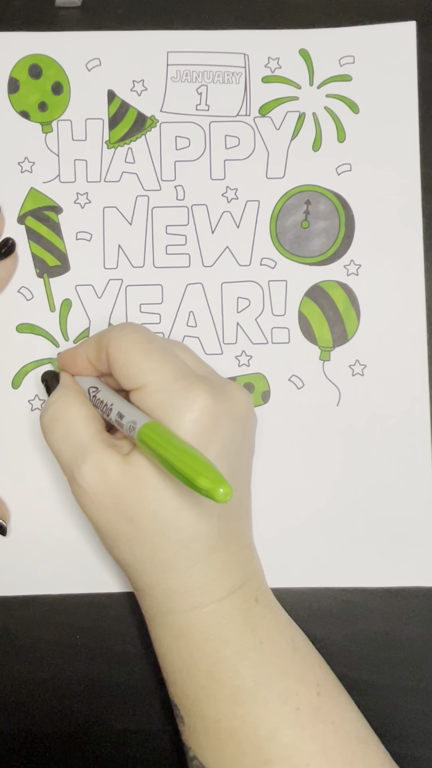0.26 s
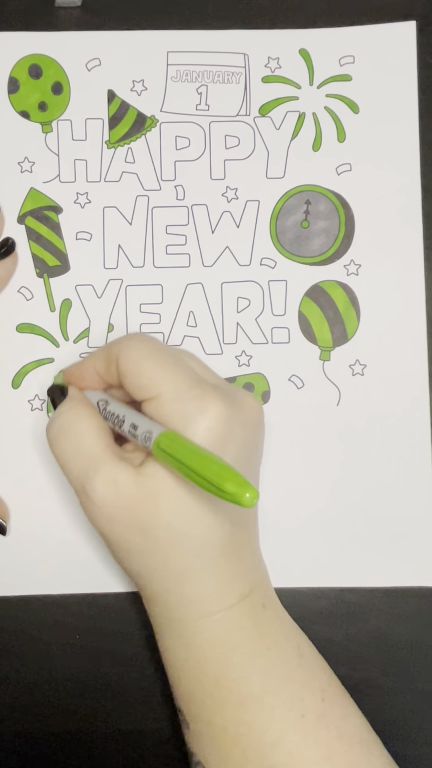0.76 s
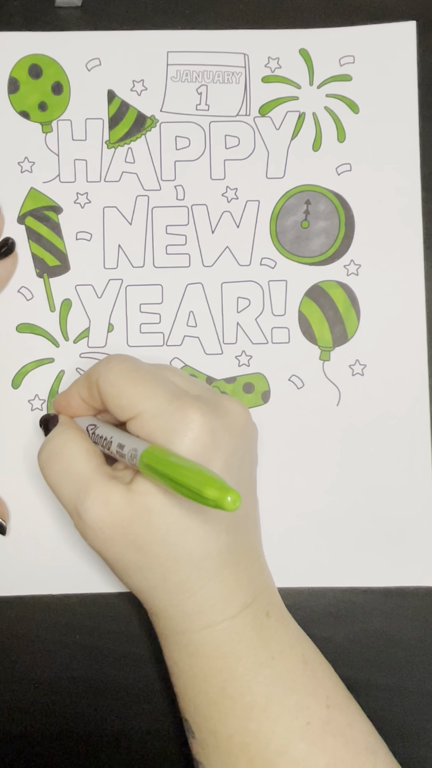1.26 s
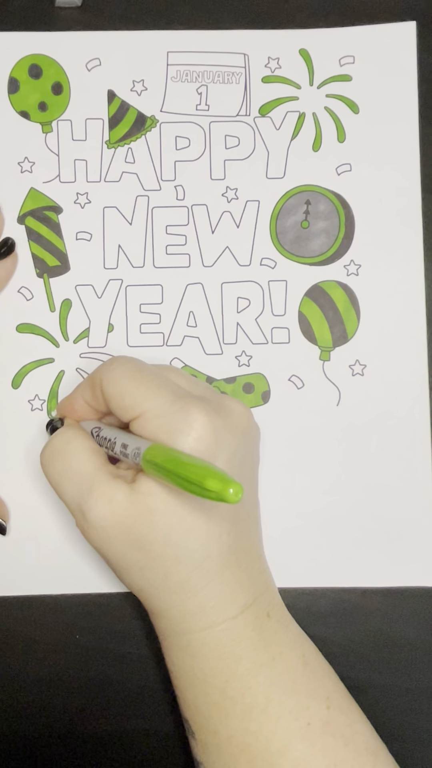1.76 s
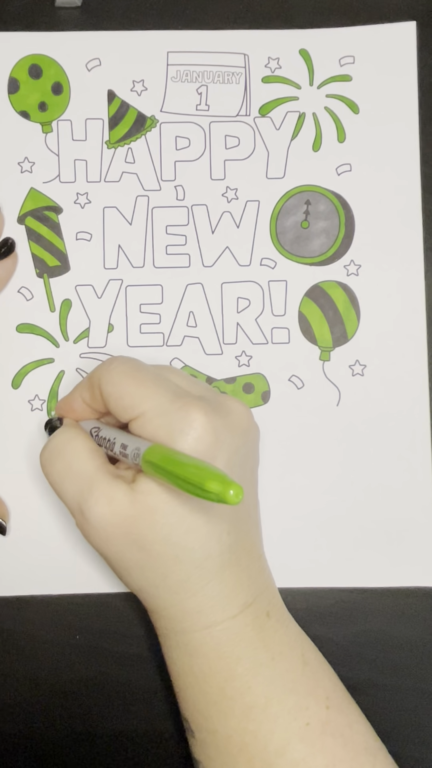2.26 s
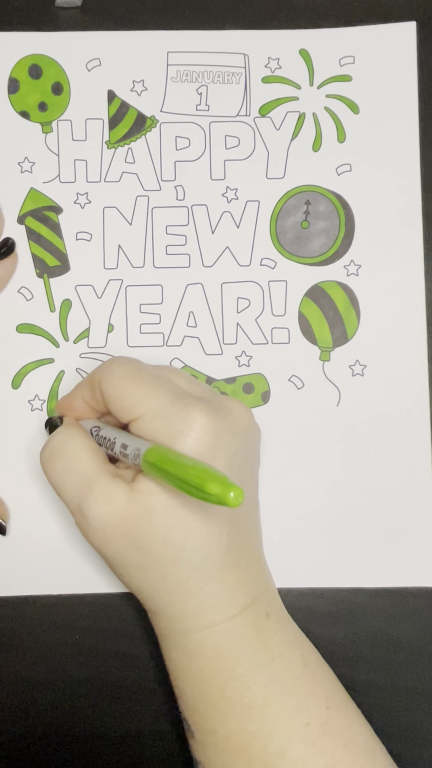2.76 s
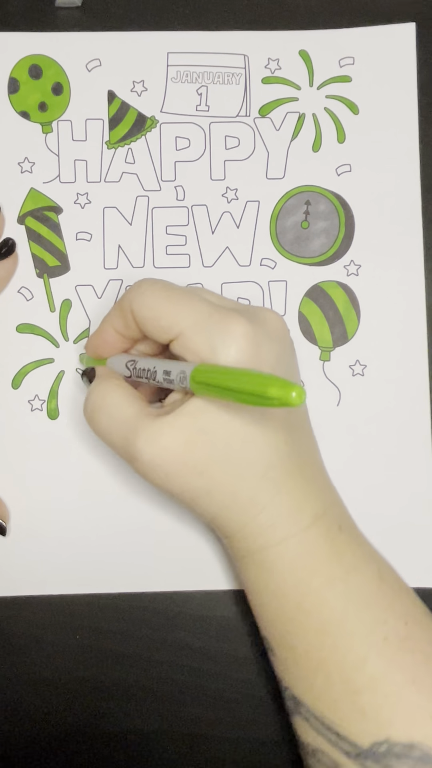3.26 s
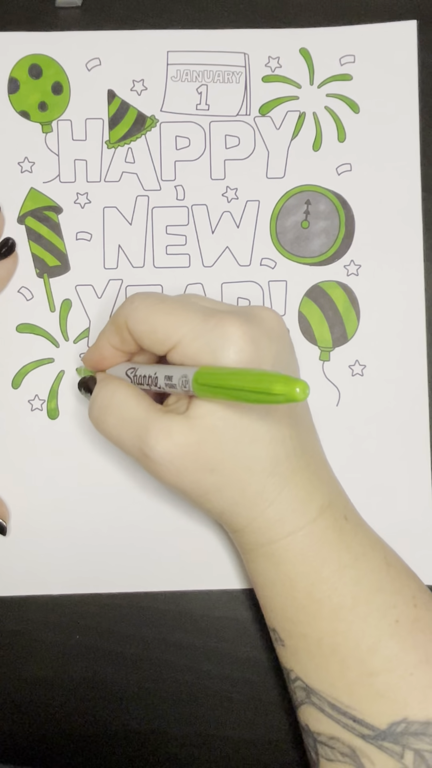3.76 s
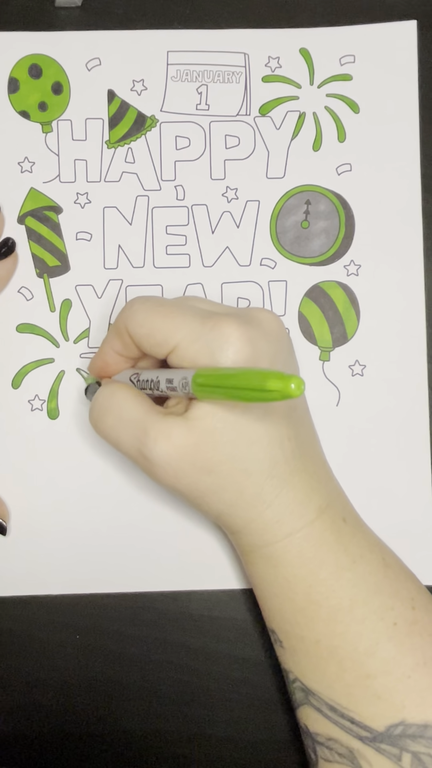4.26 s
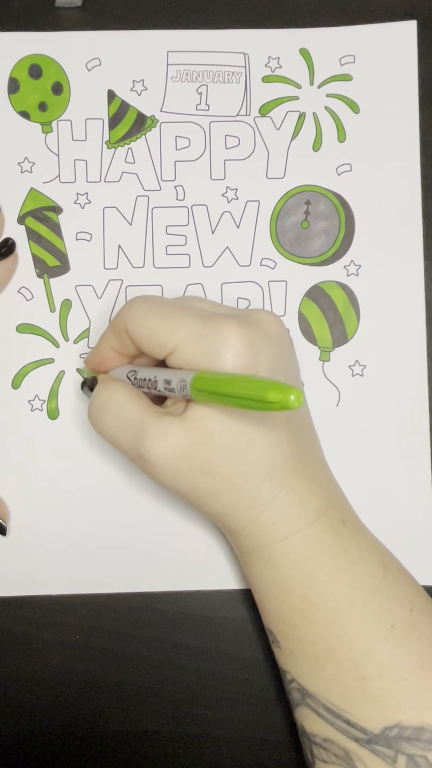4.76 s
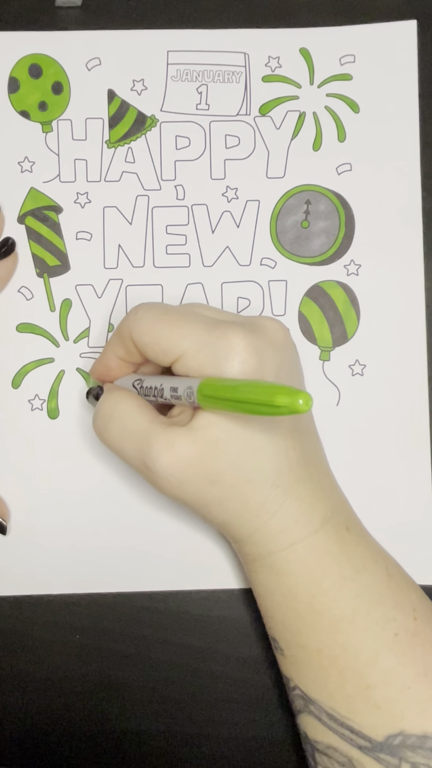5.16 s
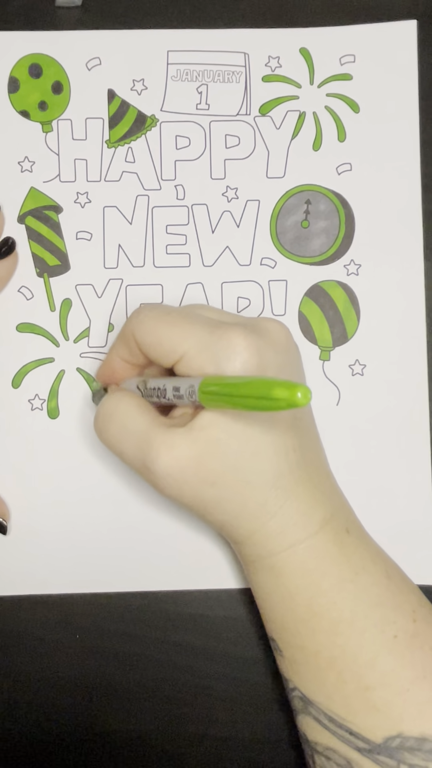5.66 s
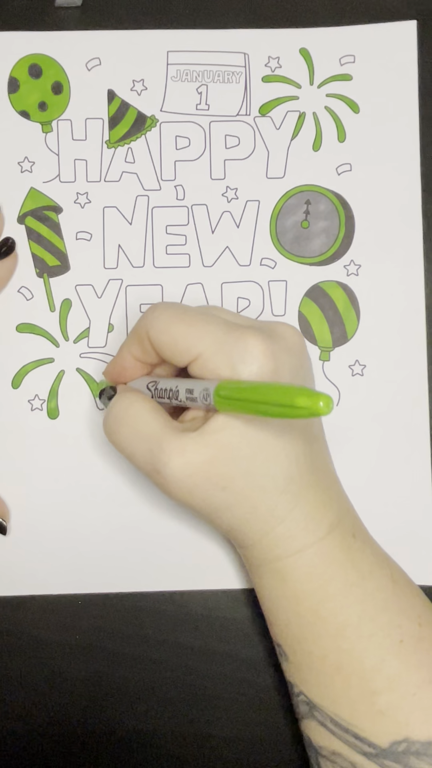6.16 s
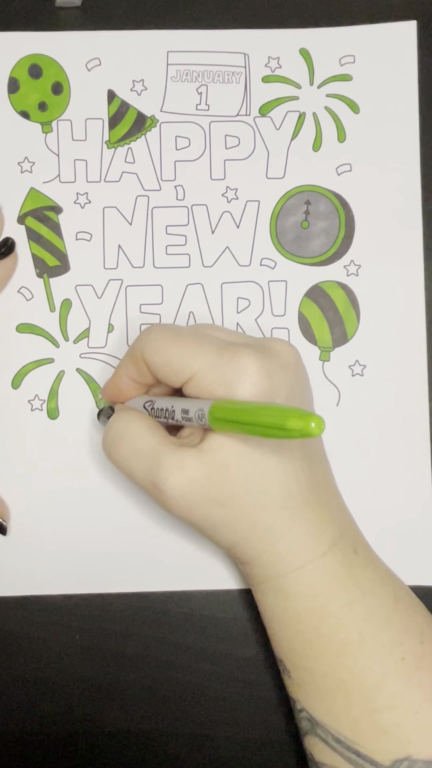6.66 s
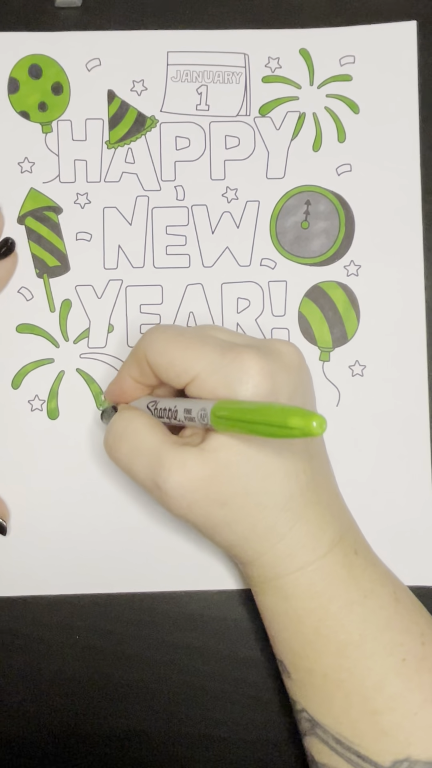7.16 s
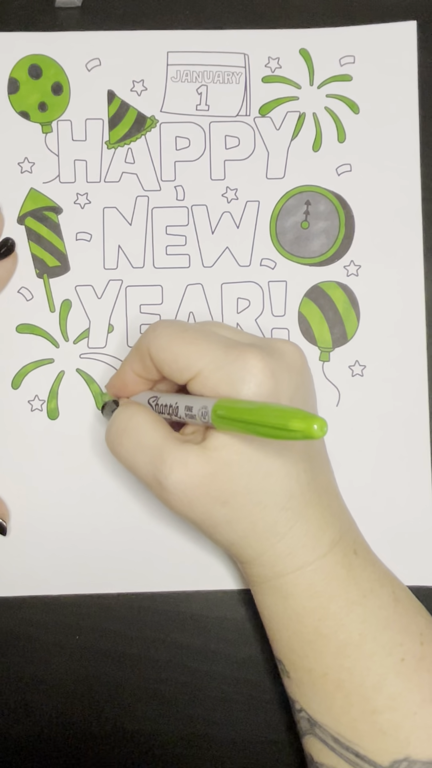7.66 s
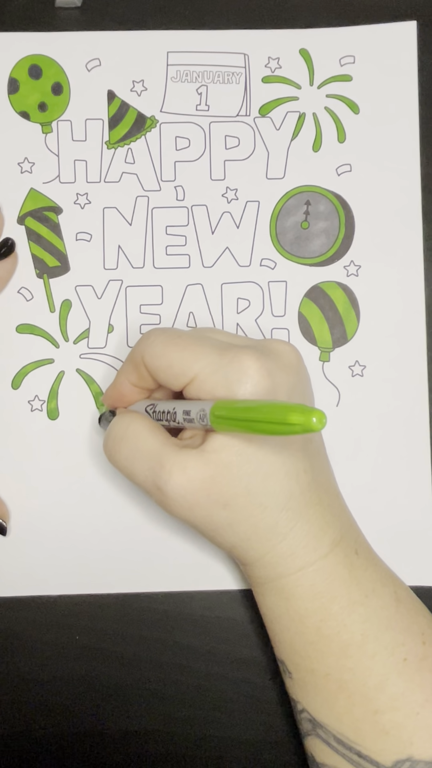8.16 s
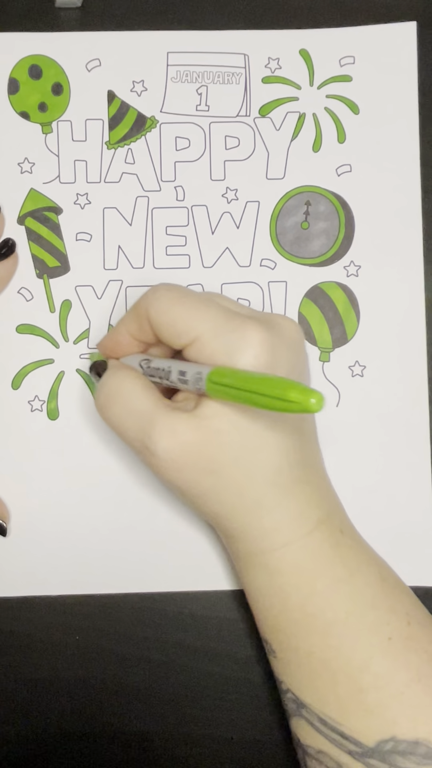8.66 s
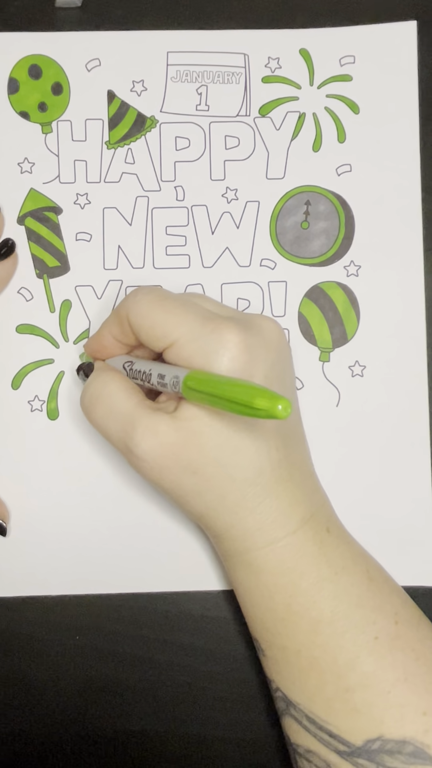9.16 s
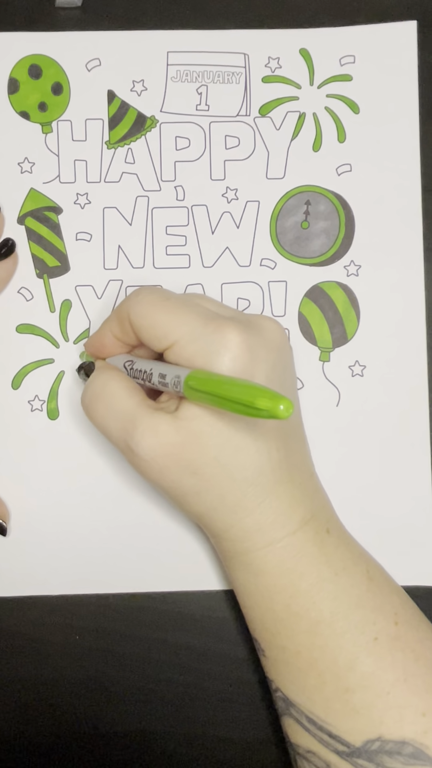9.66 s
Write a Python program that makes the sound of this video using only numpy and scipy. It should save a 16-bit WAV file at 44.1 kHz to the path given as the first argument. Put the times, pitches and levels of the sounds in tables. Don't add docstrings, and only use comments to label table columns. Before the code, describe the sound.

Close to a sheet of paper on a desk, a hand brushes softly, then a felt-tip marker makes faint outlining scratches and bursts of quick, dry back-and-forth colouring strokes. Between bursts the hand slides and regrips. Light desk bumps and forearm rubs accompany it, over low fan and mains hum in a small furnished room.

```python
import sys
import numpy as np
from scipy import signal
from scipy.fft import rfft, irfft, next_fast_len
from scipy.io import wavfile
from scipy.ndimage import uniform_filter1d, map_coordinates

SR = 44100
rng = np.random.default_rng(int(sys.argv[2]) if len(sys.argv) > 2 else 0)


def ratio_of_db(decibels):
    return 10 ** (np.asarray(decibels, float) / 20)


def wav_record(signal):
    frames = np.transpose(np.atleast_2d(signal))
    bounded = np.clip(frames, -1, 1)
    quanta = np.round(bounded * 32767).astype(np.int16)
    wavfile.write(sys.argv[1], SR, quanta)


N = 437472

# [f/Hz, width/Hz, level/dB]
SHEET_MODES = [(1170, 920, -7.5), (2280, 2600, -6.5), (4010, 1140, -5), (5600, 2100, -6),
               (7400, 1400, -5.5), (8550, 1400, -2.5), (9700, 880, 2), (10730, 740, -1.5)]
# [f/Hz, width/Hz, level/dB]
DESK_TOP_MODES = [(618, 530, -15.5), (893, 115, -9.5), (1260, 240, -25)]


def marker():
    # [t/s, length/s, peak level/dB, rise/s]
    outline = [(1.108, 0.064, -78, .018), (1.189, 0.063, -70, .009), (1.298, .088, -77.1, .014),
               (1.357, 0.043, -71, .008), (1.413, 0.11, -71.5, 0.043), (1.523, 0.18, -71.5, .008),
               (1.65, 0.11, -68.5, 0.039), (1.725, 0.11, -61.5, 0.098), (1.818, 0.23, -56, 0.098),
               (1.884, 0.032, -51, .002), (2.06, 0.12, -63, 0.012), (2.12, 0.14, -58, 0.043),
               (2.25, 0.078, -62.5, 0.067), (2.312, 0.12, -61, 0.015), (2.396, .06, -66, 0.0081)]
    strokes_1 = [(2.46, 0.081, -51.5, 0.0084), (2.55, 0.078, -51.5, 0.015), (2.63, 0.077, -50, 0.011),
                 (2.711, 0.062, -48.5, 0.0076), (2.773, 0.071, -49.5, 0.02), (2.848, 0.038, -48.5, 0.0051)]
    strokes_2 = [
        (3.893, .036, -89, .017),
        (4.012, .03, -79.5, .004),
        (4.139, 0.19, -52, 0.11),
        (4.378, 0.13, -47.5, 0.0078),
        (4.521, .12, -48.5, 0.045),
        (4.66, 0.1, -44.5, 0.0094),
        (4.775, .11, -47, 0.019),
        (4.901, 0.068, -46.5, 0.017),
    ]
    strokes_3 = [
        (5.264, 0.17, -51, 0.071),
        (5.443, 0.096, -44, 0.0077),
        (5.541, 0.094, -42, 0.017),
        (5.65, 0.072, -40, 0.015),
        (5.737, 0.093, -44.5, 0.012),
        (5.845, 0.068, -43, 0.0056),
        (5.921, 0.11, -46, 0.018),
        (6.03, 0.031, -78, .006),
    ]
    strokes_4 = [
        (6.556, 0.13, -53.5, 0.073),
        (6.701, 0.072, -47, 0.018),
        (6.786, 0.087, -47, .013),
        (6.869, 0.085, -44, 0.055),
        (6.964, 0.08, -43.5, 0.008),
        (7.044, 0.068, -40, 0.019),
        (7.128, 0.069, -42, 0.0048),
        (7.202, 0.069, -40, 0.025),
        (7.285, 0.071, -44, 0.0074),
        (7.362, 0.021, -72, .006),
    ]
    strokes_5 = [(7.615, 0.13, -58.5, 0.08), (7.725, 0.19, -67.5, 0.062), (7.895, 0.092, -61.5, 0.052),
                 (8.017, 0.12, -60.5, 0.032), (8.146, 0.019, -62, 0.007), (8.166, 0.039, -62, 0.0027),
                 (8.253, 0.16, -64.5, 0.019), (8.402, 0.052, -54, 0.0077)]
    strokes_6 = [(9.212, 0.17, -55, 0.063), (9.378, 0.19, -57, 0.044), (9.49, .19, -59.5, 0.0084),
                 (9.663, 0.021, -62.5, .007), (9.686, .18, -55, 0.066), (9.878, 0.0079, -58.5, 0.0028),
                 (9.86, .12, -58.5, 0.068)]
    # [f/Hz, width/Hz, level/dB]
    grip_outline = [(1300, 2000, -13.5), (2050, 570, -8.5), (2790, 230, -13), (3550, 910, -11),
                    (4540, 550, -14), (4900, 440, -14), (5400, 620, -7.5), (6880, 660, -7),
                    (8420, 1400, -6.5), (8800, 680, -8), (9760, 530, 1.5), (10600, 600, -5),
                    (11570, 370, -13)]
    grip_1 = [(1320, 1600, -17.5), (2060, 660, -7.5), (2780, 260, -11.5), (3570, 1300, -15.5),
              (4640, 620, -13), (5030, 200, -26), (5460, 850, -10), (6840, 390, -4.5), (8560, 2900, -9.5),
              (8900, 1100, -13), (9700, 990, 4), (10500, 680, -5.5), (11640, 440, -13)]
    grip_2 = [(1460, 430, -5), (1980, 460, -1.5), (2700, 500, -8.5), (3630, 520, -5.5), (4430, 420, -4.5),
              (5080, 810, -3.5), (5720, 750, 2), (7200, 810, -4.5), (8400, 1300, -8), (9100, 630, -12),
              (9740, 1040, -7.5), (11150, 580, -5), (12650, 530, -21.5)]
    grip_3 = [(1480, 410, -9.5), (2006, 400, -3), (2700, 460, -8.5), (3610, 710, -7), (4380, 400, -6.5),
              (4870, 710, -4.5), (5620, 800, 3), (7220, 1100, -6), (8630, 1300, -6), (8950, 550, -6),
              (10070, 970, -1), (11250, 340, -1.5), (12660, 640, -14.5)]
    grip_4 = [(1520, 370, -12), (2000, 550, -7.5), (2680, 430, -10), (3560, 820, -7.5), (4400, 720, -6.5),
              (5030, 990, -9), (5550, 770, -1.5), (6970, 1200, -10.5), (8520, 1700, -17),
              (9160, 1030, -2.5), (10180, 610, 0.7), (10570, 550, 1.5), (12450, 860, -19)]
    grip_5 = [(1460, 1300, -11.5), (1970, 350, -8), (2690, 400, -16), (3560, 720, -6.5), (4370, 630, -9),
              (4900, 340, -13), (5400, 1200, -3.5), (7170, 660, -8.5), (8350, 910, -23), (9400, 1170, 1.5),
              (10420, 510, 2), (10550, 440, -0.5), (11500, 440, -19)]
    grip_6 = [(1400, 550, -5.5), (1900, 880, -8.5), (2830, 1110, -24), (3660, 520, -5.5), (4400, 230, -11),
              (5300, 1300, -7.5), (5930, 630, -2), (7250, 850, -6), (8250, 950, -6), (9000, 980, -12),
              (9940, 590, 2.5), (10830, 460, -3.5), (11600, 780, -14)]
    # [share of the stroke after its rise spent slowing,
    # brightness/dB, brightness per level over the grip's mean/(dB/dB)]
    touches = [(0.75, -3.5, 0.13), (0.77, -2, 0.7), (0.81, -1, 0.57), (0.63, -0.5, .5), (0.56, 1.8, .4),
               (1, -2.5, -0.14), (0.86, 0, -1.1)]
    returns = [(1.005, 1), (1, 1), (1.002, 1.06), (1, 0.78), (1, 0.79), (1.003, 1.04), (0.993, 1.07)]
    sheens = [
        [0, 0, 0, 0, 0, 0, 0, 0, 0, 0, 0, 0, 0, 0, 0],
        [0, -0.5, 0, -1.5, -0.5, -1],
        [3, 1, 0, 2, 2.5, 1, 0, 0],
        [0, 1.5, 1.5, 1.5, 1, 1, -0.5, 3],
        [0, 0, 0, 0.5, -0.2, 1, -0.5, 0, 0.7, 6],
        [-3, 0, 7, -1, -10, -8, 1, 1],
        [-1, -2.5, 0.5, -5, 1, -1, -3],
    ]
    firmness = [0.3, 0.97, -1.3, -1.5, -0.8, 0.8, 0.3]

    strokes = [outline, strokes_1, strokes_2, strokes_3, strokes_4, strokes_5, strokes_6]
    grips = [grip_outline, grip_1, grip_2, grip_3, grip_4, grip_5, grip_6]
    total = np.zeros((2, N))
    for rows, grip, firm_db, touch, back, sheen in zip(strokes, grips, firmness, touches, returns, sheens):
        desk = [(hz, width, db + firm_db) for hz, width, db in DESK_TOP_MODES]
        total += friction(rows, grip + desk, touch, back,
                          grain_db=1.5, drift_db=1.07, skip_db=1.5, sheen_db=sheen)
    return total


def friction(rows, modes, touch, back, grain_db, drift_db, skip_db, sheen_db=None):
    out = np.zeros((2, N + 2 * SR))
    slowing, grip_db, per_db = touch
    mean_db = np.mean([row[2] for row in rows])
    for n, (start_s, length, peak_db, rise) in enumerate(rows):
        pitch, slower = back if n % 2 else (1, 1)
        t = np.arange(int(length * SR)) / SR
        fall = max(slowing * slower * (length - rise), min(0.018, length / 2))
        bright_db = grip_db + per_db * (peak_db - mean_db)
        if sheen_db:
            bright_db += sheen_db[n]
        fibres = fibre_noise(len(t), peak_db, grain_db, skip_db)
        early, late = filtered(fibres, stroke_response(modes, drift_db, pitch, bright_db))
        sound = early + (late - early) * t / length
        treble = filtered(sound, lambda f: (f > 2500) & (f < 11500))
        at = SR + round(start_s * SR)
        out[:, at:at + len(t)] += sound / np.std(treble) * ratio_of_db(peak_db) * tip_speed(t, length, rise, fall)
    return out[:, SR:SR + N]


def fibre_noise(count, peak_db, grain_db, skip_db):
    clumps = uniform_filter1d(rng.standard_normal(count), 60)
    flutter = uniform_filter1d(rng.standard_normal(count), 450) * np.sqrt(450)
    light = np.clip((-44.0 - peak_db) / 15, 0.2, 1)
    return rng.standard_normal((2, count)) * ratio_of_db(grain_db * unit(clumps) + skip_db * light * flutter)


def stroke_response(modes, drift_db, pitch, bright_db):
    ripple = rng.standard_normal(200)
    drift = drift_db * rng.standard_normal(len(modes))
    pitch = pitch * (1 + 0.013 * rng.standard_normal())
    glide = 0.02 * rng.standard_normal() * np.array([-0.5, 0.5])[:, None, None]

    def ring(f):
        power = 0
        for (hz, width, db), extra_db in zip(modes, drift):
            detuning = (hz * hz - f * f) / (f * width + 1)
            power = power + (ratio_of_db(db + extra_db) / (1 + detuning ** 2)) ** 2
        return np.sqrt(power)

    def tilt(f):
        shelf = ratio_of_db(bright_db / (1 + (7500 / (f + 1)) ** 8))
        return shelf / np.sqrt(1 + (f / 12900) ** 30)

    def comb(f):
        ripple_db = 1.6 * np.interp(f, np.linspace(0, SR / 2, len(ripple)), ripple)
        return ratio_of_db(ripple_db) * (f > 0)

    return lambda f: ring(f / (pitch + glide)) * tilt(f) * comb(f / (1 + glide))


def tip_speed(t, length, rise, fall):
    start = np.clip(t / rise, 0, 1) ** 0.8
    stop = np.sin(np.pi / 2 * np.clip((length - t) / fall, 0, 1)) ** 1.5
    return start * stop


def ticks():
    # [t/s, peak level/dB]
    snaps = [(2.2882, -52), (2.3294, -56), (4.151, -59), (7.954, -49), (8.084, -50), (9.4045, -51),
             (9.4225, -48), (9.5044, -45), (9.5477, -45), (9.6044, -60), (9.6474, -53)]
    length, rms_db = 0.004, -7
    rows = [(s - length / 5, length, db + rms_db, length / 5) for s, db in snaps]
    return friction(rows, SHEET_MODES, (1, 0, 0), (1, 1), grain_db=-5, drift_db=1, skip_db=0)


def hand():
    # [t/s, length/s, peak level/dB, rise/s]
    slides = [(-.041, .14, -59, .018), (.608, 0.031, -74, .004), (.701, 0.24, -62.5, 0.11),
              (2.88, 0.067, -74, .01), (2.937, .055, -61, 0.027), (5.012, 0.12, -65.5, 0.043),
              (5.115, .15, -80.5, .028), (6.326, 0.81, -77, .009), (8.428, 0.2, -78, .02),
              (8.516, 0.28, -60, 0.056)]
    # [t/s, length/s, peak level/dB, rise/s]
    drags = [
        (2.967, 0.38, -61.5, 0.071),
        (3.19, 0.18, -60.5, 0.061),
        (3.363, 0.24, -75.5, 0.01),
        (6.117, 0.23, -55, 0.097),
    ]
    # [f/Hz, width/Hz, level/dB]
    heel_modes = [(2270, 1000, -5)]
    # [share spent slowing, brightness/dB, brightness per level over the mean/(dB/dB)]
    skin_touch = (0.69, 0.89, 0.26)
    return sum(friction(rows, modes, skin_touch, (1, 1), grain_db=0.3, drift_db=0.5, skip_db=0.1)
               for rows, modes in [(slides, SHEET_MODES), (drags, SHEET_MODES + heel_modes)])


def forearm():
    # [t/s, peak level/dB]
    presses = [(1.6, -66), (1.71, -68), (1.9, -69), (2.33, -61.5), (2.41, -61.5), (2.93, -65), (3.09, -64),
               (4.23, -63), (4.67, -63), (4.83, -63), (4.92, -64), (5.38, -65), (5.52, -82), (5.69, -64),
               (5.97, -66), (6.32, -66), (7.6, -70), (8.04, -69), (9.28, -64), (9.45, -69), (9.75, -65),
               (9.92, -66)]
    # [f/Hz, density/dB per Hz]
    desk_colour = [(250, -24), (450, 1), (700, 10), (1000, -0.5), (1500, -26)]
    rest_db, build_s, ease_s = -73, 0.037, 0.055
    t = np.arange(N) / SR

    def press(s):
        return np.exp(np.where(t < s, (t - s) / build_s, (s - t) / ease_s))

    weight = np.max([ratio_of_db(db) * press(s) for s, db in presses], axis=0)
    return np.hypot(ratio_of_db(rest_db), weight) * ratio_of_db(1.3 * wobble(25)) * noise(desk_colour)


def knocks():
    # [t/s, peak level/dB]
    bumps = [(0.841, -61), (1.888, -55), (2.183, -58), (2.378, -51), (2.715, -54), (2.832, -52),
             (3.099, -53), (4.535, -53), (4.67, -55), (4.908, -54), (5.033, -60), (5.054, -60),
             (5.712, -51), (5.969, -59), (7.723, -55), (8.149, -61)]
    out = np.zeros(N + SR)
    t = np.arange(SR // 8) / SR
    for s, db in bumps:
        ring = 0
        for hz, _, _ in DESK_TOP_MODES[:2]:
            chance = rng.standard_normal()
            ring = ring + ratio_of_db(3.3 * chance) * np.sin(2 * np.pi * hz * (1 + 0.092 * chance) * t)
        decay = ratio_of_db(db - 6 - 60 * t / 0.06)
        out[round(s * SR):][:len(t)] += decay * (1 - np.exp(-t / 0.0028)) * ring
    return out[:N] * [[1], [0.3]]


def reverberate(x, t60, wet_db):
    t = np.arange(SR // 3) / SR
    echoes = rng.standard_normal((2, len(t))) * ratio_of_db(-60 * t / t60)
    tail = filtered(echoes, lambda f: 1 / np.sqrt(1 + (f / 5000) ** 2))
    return x + ratio_of_db(wet_db) * signal.fftconvolve(x, tail / np.linalg.norm(tail[0]), axes=1)[:, :N]


def hum():
    # [f/Hz, level/dB, unsteadiness/dB]
    tones = [(36.3, -72.5, -3.5), (113.75, -57.5, 1.5), (151.1, -64, 2), (177.2, -63.5, 3.5),
             (233.3, -73, 5), (278.5, -71.5, 4.5), (359.6, -58.5, 2), (1293, -83, 3)]
    # [t/s, level/dB]
    blade_swell = [(0.19, -54), (1.82, -62.5), (1.96, -48), (2.18, -67), (2.35, -53), (3.4, -47),
                   (3.65, -71), (4.58, -61), (4.78, -60), (5.25, -55), (5.44, -51), (7.0, -55),
                   (7.76, -48.5), (8.15, -75), (8.48, -48), (8.95, -66), (9.12, -49), (9.7, -52.5)]
    t = np.arange(N) / SR

    def tone(hz):
        return np.sqrt(2) * np.sin(2 * np.pi * (hz * t + rng.random()) + 0.27 * wobble(4))

    total = ratio_of_db(np.interp(t, *np.transpose(blade_swell)) - 2.5) * tone(75.4)
    for hz, db, loose_db in tones:
        total += ratio_of_db(db + loose_db * (wobble(4) + 0.56 * wobble(13))) * tone(hz)
    return total


def room_noise():
    # [f/Hz, density/dB per Hz]
    rumble_colour = [(20, -66), (29, -33), (38, -10), (48, -6), (60, 0.5), (74, -6), (90, -5.5), (102, -13),
                     (120, -3.5), (140, -9.5), (200, -16.5), (280, -12), (400, -22.5), (520, -79)]
    # [f/Hz, density/dB per Hz]
    air_colour = [(250, -76), (420, -5), (600, -10.5), (1000, -16), (2000, -19), (2700, -23.5),
                  (3500, -31.5), (4800, -36.5), (7000, -37), (9400, -32.5), (10900, -34.5), (11500, -41),
                  (12700, -53), (13400, -72)]
    rumble = ratio_of_db(-52 + 0.86 * wobble(1.518) + 0.16 * wobble(7)) * noise(rumble_colour)
    return rumble + ratio_of_db(-66.5 + 0.66 * wobble(1.0)) * noise(air_colour)


def noise(spectrum):
    return unit(filtered(rng.standard_normal((2, N)), lambda f: ratio_of_db(along(spectrum, f))))


def unit(x):
    return x / np.sqrt(np.mean(x ** 2) + 1e-20)


def along(points, hz):
    f, v = np.transpose(points)
    return np.interp(np.log(hz + 1), np.log(f + 1), v)


def wobble(rate):
    knots = rng.standard_normal(int(N * rate / SR) + 4)
    return map_coordinates(knots, [np.arange(N) * rate / SR])


def filtered(x, response):
    m = next_fast_len(x.shape[-1] + 4096)
    return irfft(rfft(x, m) * response(np.fft.rfftfreq(m, 1 / SR)), m)[..., :x.shape[-1]]


def ports(pair, alike, lead):
    def turn(hz):
        u = np.arccos(np.clip(along(alike, hz), 0, 1)) / 2
        half = np.exp(0.5j * along(lead, hz))
        return np.array([[np.cos(u) * half, np.sin(u) * half], [np.cos(u) / half, -np.sin(u) / half]])
    return filtered(pair[None], turn).sum(1)


def drop_weak_bands(x, from_hz, top_db, pair_db):
    hz, _, z = signal.stft([x[0] + x[1], x[0] - x[1]], SR, nperseg=2048)
    hz = hz[:-1]
    power = abs(z[:, :-1]) ** 2
    bands = np.repeat(power.reshape(2, 64, 16, -1).mean(axis=2), 16, axis=1)
    treble = power[:, (hz > 3000) & (hz < 11000)].mean(axis=(0, 1))
    strong = (hz[:, None] < from_hz) | (bands.sum(axis=0) > treble * ratio_of_db(2 * top_db))
    needed = (hz[:, None] < 1300) | (bands > bands[::-1] * ratio_of_db(pair_db)[:, None, None] ** 2)
    z[:, :-1] *= strong & needed
    mid, side = signal.istft(z, SR, nperseg=2048)[1][:, :N] / 2
    return np.array([mid + side, mid - side])


def scene():
    # [f/Hz, lead/rad]
    lead_near = [(150, 0), (690, .8), (1300, .05), (2300, .2), (3000, .7), (3600, .5), (4550, 1.2),
                 (4850, 3.6), (5800, 6.2), (6200, 6.5), (8950, 9.36), (9400, 9.5), (11400, 11.6),
                 (11900, 12.57)]
    lead_far = [(150, 0), (600, .9), (1000, 1.5), (1600, 0), (2400, .5), (3100, 1.3), (3800, .4), (4850, 3),
                (5800, 6.2), (6200, 6.5), (8950, 9.36), (9400, 9.5), (11400, 11.6), (11900, 12.57)]
    # [f/Hz, likeness 0-1]
    alike_near = [(700, .45), (1000, .45), (1400, .95), (2200, .97), (3000, .75), (3600, .9), (4700, .78),
                  (6000, .98), (7000, .9), (8500, .93), (9000, 1), (9350, 1), (11300, .9), (11900, 1)]
    alike_far = [(100, 1), (300, .97), (500, .8), (850, .2), (1900, .9), (2600, .35), (3800, .6),
                 (4600, .4), (6000, .98), (7000, .8), (8500, .9), (9000, 1), (9350, 1), (11400, .78),
                 (11900, 1)]
    desk = marker() + ticks() + hand() + forearm() + knocks()
    near = reverberate(desk, t60=0.26, wet_db=-16.5)
    far = room_noise() + hum() * [[1], [0.15]]
    return ports(near, alike_near, lead_near) + ports(far, alike_far, lead_far)


def roll_off(x):
    return signal.sosfilt(signal.butter(12, 13250, fs=SR, output="sos"), x)


def record(dry):
    # [f/Hz, level/dB]
    left_tilt = [(60, -0.3), (140, -1.83), (330, -3), (460, -4), (700, 0.5)]
    wet = filtered(dry, lambda f: ratio_of_db(along(left_tilt, f) * [[0.5], [-0.5]]))
    wet = drop_weak_bands(wet, from_hz=11300, top_db=-12, pair_db=[-16, -11.5])
    return roll_off(wet)


dry = scene()
out = record(dry)
wav_record(out)
```